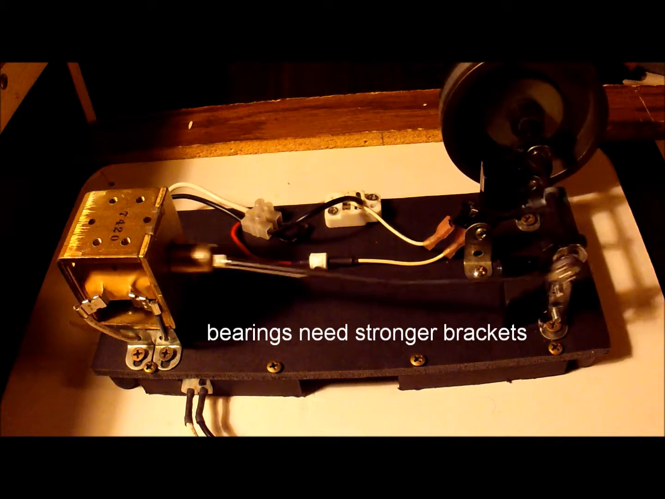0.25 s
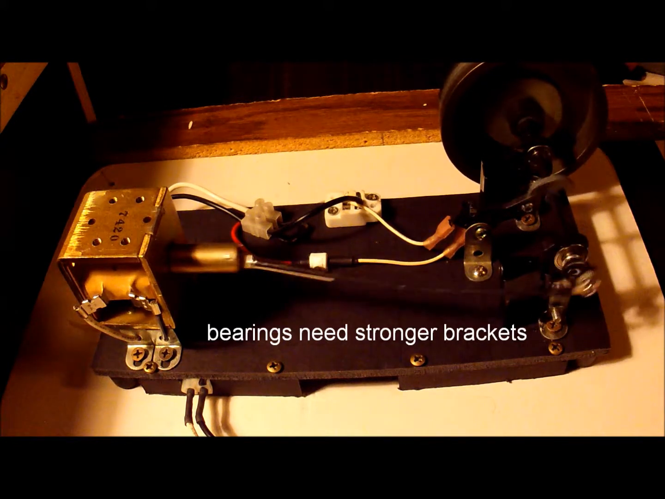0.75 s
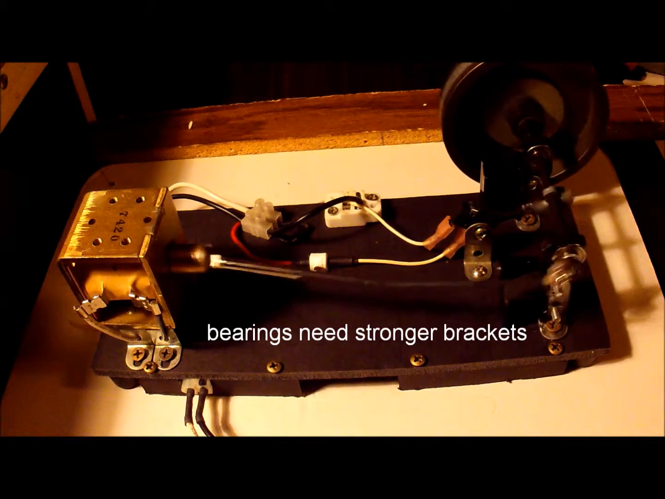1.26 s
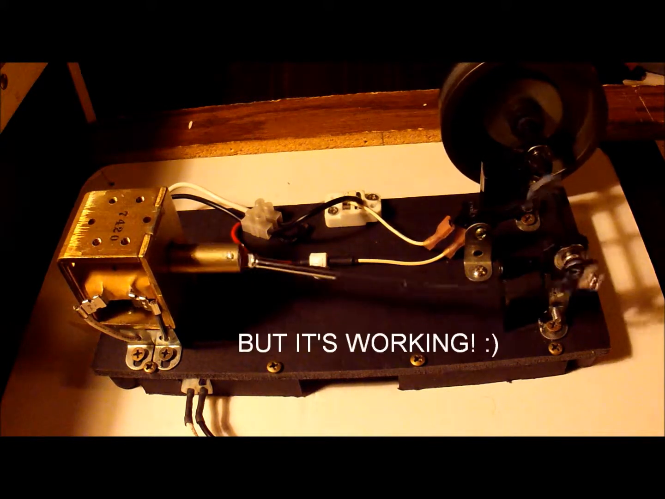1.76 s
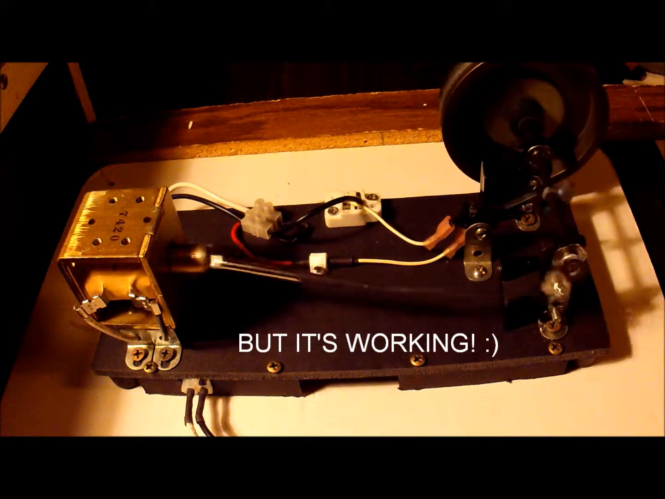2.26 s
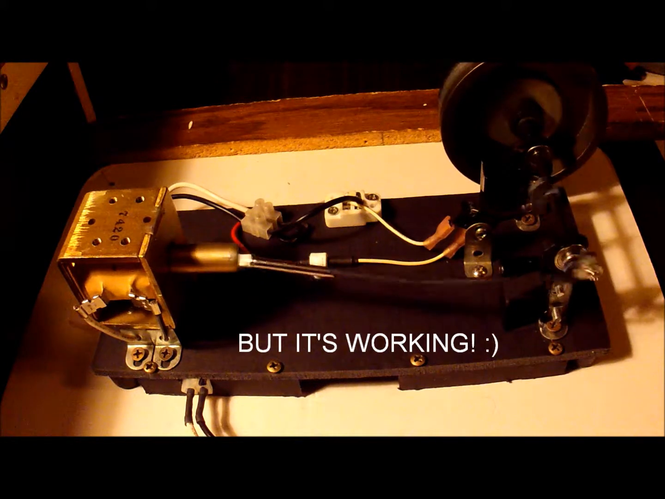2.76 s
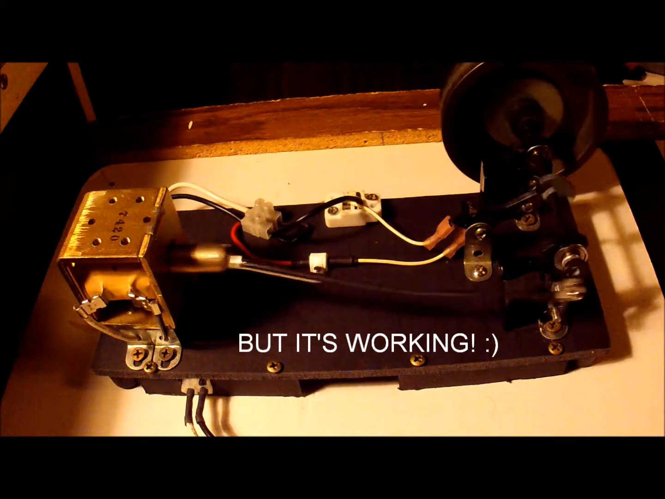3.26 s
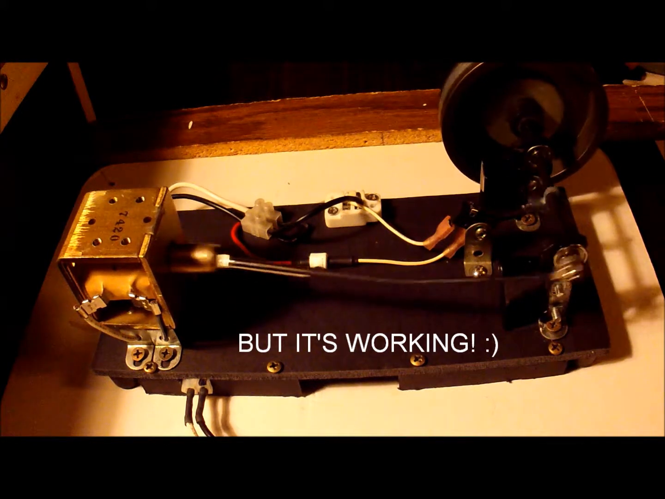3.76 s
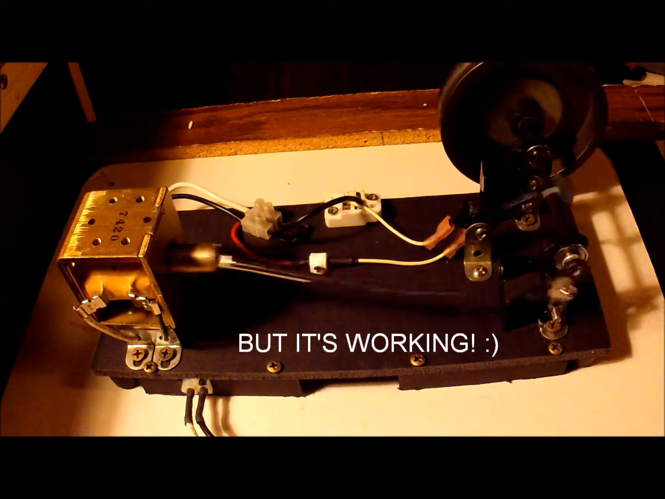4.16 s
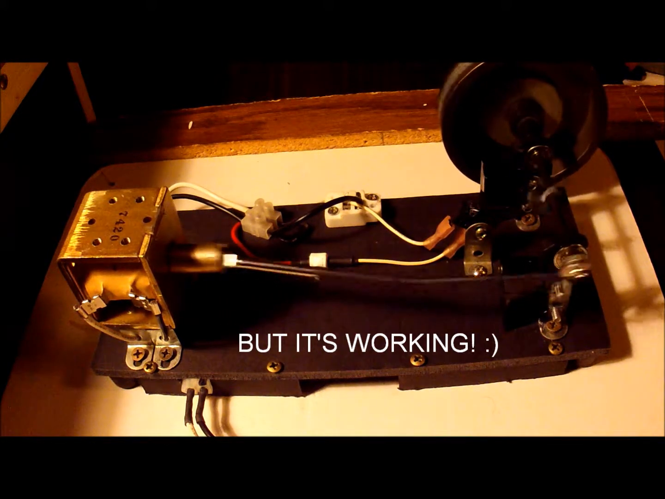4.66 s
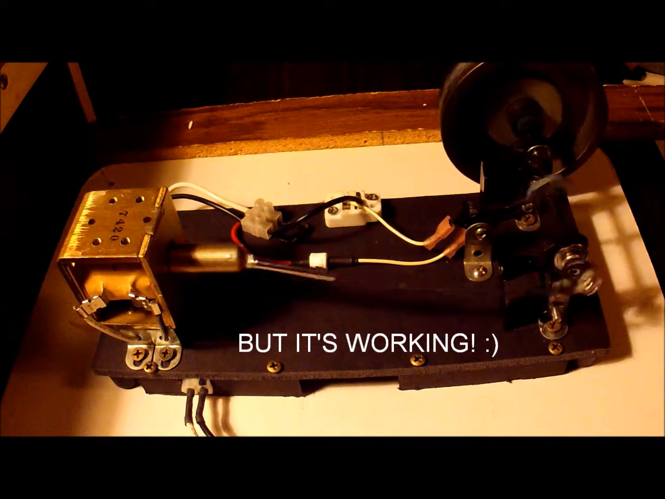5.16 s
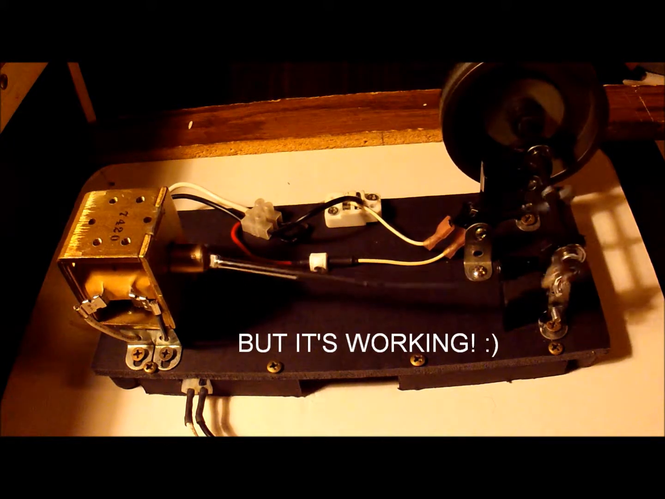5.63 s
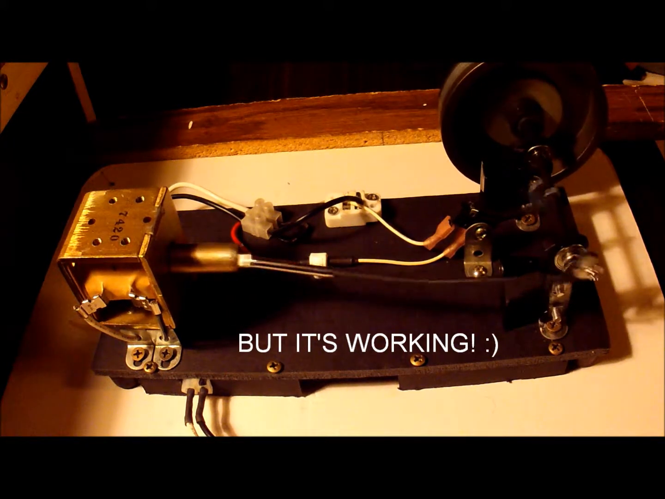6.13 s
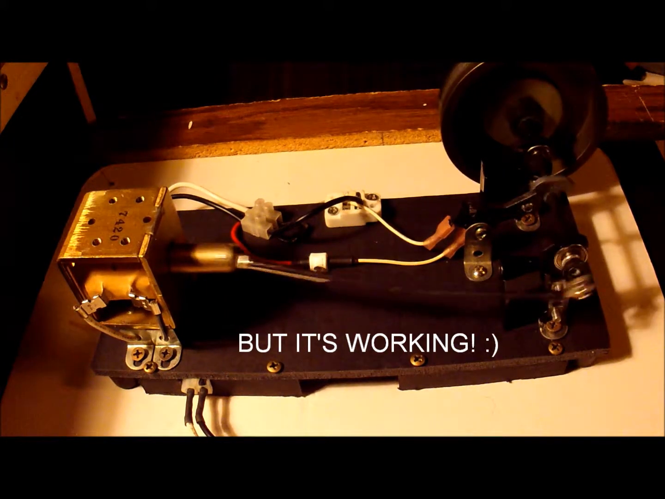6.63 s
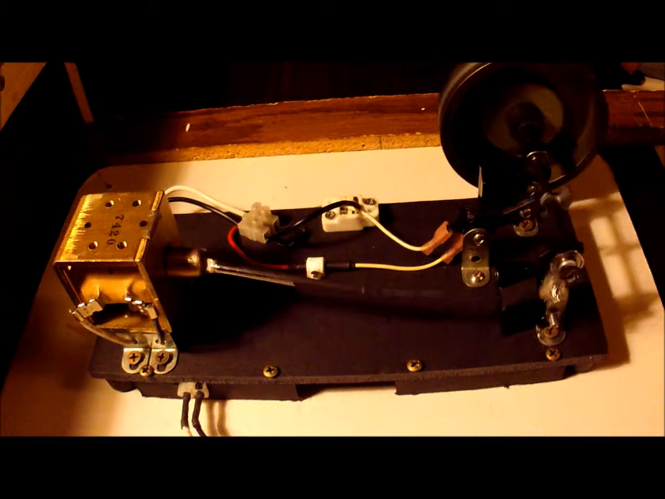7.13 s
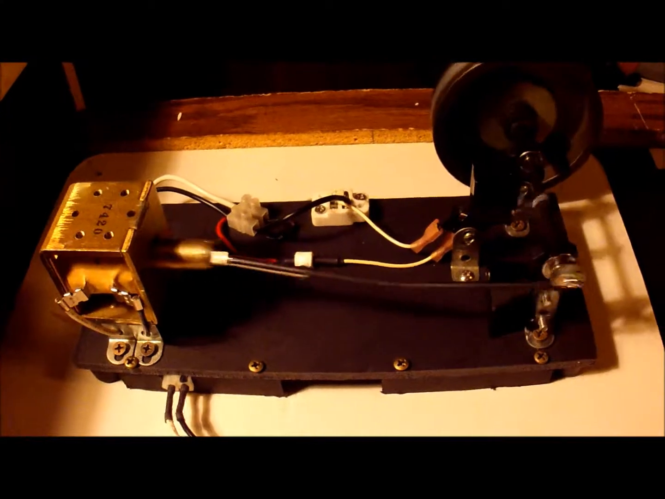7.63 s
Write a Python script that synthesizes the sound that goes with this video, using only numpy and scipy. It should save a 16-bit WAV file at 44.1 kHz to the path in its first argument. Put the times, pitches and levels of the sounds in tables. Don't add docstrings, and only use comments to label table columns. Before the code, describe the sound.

A small solenoid engine on a wooden board runs close to the microphone, clacking about three times a second and very slowly speeding up. Between clacks come a light rod tap, a contact tick, a scrape and a brief metallic singing. Steady hiss lies beneath, with a short small-room echo. In the last second fingers brush and knock the camera case, one knock especially sharp.

```python
import sys
import numpy as np
from scipy import signal
from scipy.fft import rfft, irfft
from scipy.io import wavfile
from scipy.ndimage import uniform_filter1d

SR = 44100
rng = np.random.default_rng(int(sys.argv[2]) if len(sys.argv) > 2 else 0)


def volts_from_db(level):
    exponent = np.asarray(level, float) / 20
    return 10 ** exponent


def unload_audio(sound):
    columns = np.transpose(np.atleast_2d(sound))
    steps = np.round(np.clip(columns, -1, 1) * 32767)
    wavfile.write(sys.argv[1], SR, steps.astype(np.int16))


N = 347949
TIME = np.arange(N) / SR

# t/s, level/dB, first bounce delay/ms, bounce level/dB
CLACKS = [(0.318, -28.5, 5.5, -4), (0.6483, -29, 5.1, -13), (0.9761, -27.5, 4.9, -7), (1.3008, -27, 7, -12),
          (1.6231, -28, 5.5, -25), (1.943, -26, 3.3, -16), (2.2617, -29.5, 4.7, -3),
          (2.5776, -28.5, 4.9, -6.5), (2.8921, -27, 5.2, -9), (3.2041, -29.5, 5, -12),
          (3.5146, -28, 6.55, -12.5), (3.8237, -27.5, 3.3, -17), (4.1318, -28, 7, -15),
          (4.4392, -27, 5.4, -13), (4.7456, -28, 6.6, -12), (5.0498, -30.5, 9.8, -1.5),
          (5.3541, -32, 3.35, 0.5), (5.6527, -31.5, 6.8, 0), (5.9532, -29, 6.9, -2.5),
          (6.252, -31, 5.1, -2), (6.5485, -30.5, 5.7, -0.5), (6.844, -31, 5.1, 0.5), (7.1382, -27, 6.1, -6),
          (7.4294, -31, 4.3, 4), (7.7216, -28.5, 3.5, -6)]
# t/s, level/dB
TAPS = [(0.143, -47), (0.484, -43.5), (0.795, -41.5), (1.129, -43.5), (1.464, -39), (1.778, -40),
        (2.098, -41), (2.404, -43), (2.713, -42), (3.038, -39.5), (3.337, -43.5), (3.648, -41.5),
        (3.956, -40), (4.267, -43), (4.57, -39.5), (4.874, -40.5), (5.177, -40), (5.477, -39.5),
        (5.779, -37.5), (6.077, -37.5), (6.375, -38.5), (6.67, -37), (6.965, -44), (7.258, -38),
        (7.551, -39), (7.84, -37)]
# t/s, level/dB, singing level/dB
CRESTS = [(0.252, -60, -41.5), (0.582, -48, -40), (0.909, -57, -43), (1.234, -53, -43),
          (1.559, -36.5, -41.5), (1.876, -43, -45), (2.195, -48, -43), (2.511, -56, -42.5),
          (2.824, -54, -42.5), (3.14, -38, -42), (3.448, -46, -43.5), (3.759, -33.5, -40),
          (4.067, -45, -41), (4.374, -32.5, -41), (4.68, -53, -40), (4.982, -53, -40), (5.285, -58, -40.5),
          (5.585, -44, -39.5), (5.885, -56, -41.5), (6.183, -40, -43.5), (6.482, -48, -41),
          (6.781, -45, -41), (7.068, -50, -43.5), (7.361, -56, -43), (7.653, -41, -42)]

MEAN_TURN_S = 0.31
# lead before the spark/s, extra lead/s per s of slower turn,
# level/dB, level gain/dB per turn/s, scatter/dB
CONTACT = (0.130, 0.6, -73, 21, 2)
PULL = (0.095, 0.55, -37, 14, 2.5)
RIDGE = (0.033, 0.1, -44, 10.5, 3.7)
GRIT_HZ, RADIATE_HZ = 2400, 800


def ring(x, hz, t60):
    radius = 1000. ** (-1 / (t60 * SR))
    w = 2 * np.pi * hz / SR
    return signal.lfilter([0, np.sin(w)], [1, -2 * radius * np.cos(w), radius * radius], x)


def band(x, lo_hz, hi_hz):
    y = signal.sosfilt(signal.butter(2, [lo_hz, hi_hz], "band", fs=SR, output="sos"), x)
    return y / y.std()


def highpass(x, order, hz):
    return signal.sosfilt(signal.butter(order, hz, "high", fs=SR, output="sos"), x)


def clicks(s, size):
    return np.bincount(np.clip((s * SR).astype(int), 0, N - 1), size, N)


def tent(x, at, db, rise, fall):
    return volts_from_db(db - np.where(x < at, abs(rise) * (at - x), abs(fall) * (x - at)))


def hold(a, on, off, db, rise, release, idle_db):
    this_turn = tent(a, on, db, rise, 0) * tent(a, off, 0, 0, release)
    last_turn = tent(a + 1, off, db, 0, release)
    return this_turn + last_turn + volts_from_db(idle_db)


def mic_db(hz):
    # f/Hz, level/dB
    colour = [(30, -24.5), (200, -14.5), (500, -13.5), (760, -9), (1050, -3), (1350, 0.5), (1700, -3),
              (2200, -11.5), (2700, -24), (4000, -26.5), (5000, -31), (7000, -28), (10500, -21.5),
              (15500, -16.5)]
    colour_hz, colour_db = np.transpose(colour)
    return np.interp(np.log(hz + 1e-9), np.log(colour_hz), colour_db)


def opening():
    s = np.r_[-0.012, np.array(CLACKS)[:, 0]]
    turn_s = uniform_filter1d(np.gradient(s), size=3, mode="nearest")
    return s + 0.011 + 0.26 * (turn_s - MEAN_TURN_S), turn_s


def part(lead_s, stretch, db, gain_db, scatter_db):
    s, turn_s = opening()
    at = s - lead_s - stretch * (turn_s - MEAN_TURN_S)
    db = db + gain_db * (1 / turn_s - 1 / MEAN_TURN_S) + scatter_db * rng.standard_normal(len(s))
    return at[at > 0], db[at > 0]


def turn():
    clack, crest = np.array(CLACKS)[:, 0] - 0.002, np.array(CRESTS)[:, 0]
    tap = np.array(TAPS)[:, 0]
    marks = [(clack, 1), (crest, 0.81), (part(*PULL)[0], 0.74), (part(*CONTACT)[0], 0.615), (tap[:-1], 0.45)]
    count = len(clack)
    s = np.concatenate([m for m, _ in marks] + [[-0.0056, tap[-1], 8.01]])
    angle = np.concatenate([np.arange(count) + a for _, a in marks] + [[0, count + 0.45, count + 1]])
    return np.interp(TIME, np.sort(s), np.sort(angle))


def still_air():
    return volts_from_db(-45.5) * rng.standard_normal(N)


def bench_drone():
    return volts_from_db(-65) * band(rng.standard_normal(N), 208.6, 298)


def room(near):
    echo = rng.standard_normal(SR // 4) * 1000. ** (-np.arange(SR // 4) / SR / 0.15)
    return signal.fftconvolve(near, echo)[:N] * volts_from_db(-41.5)


def grains(per_s, spread_db):
    chance = rng.random((3, N))
    sign = np.sign(chance[1] - 0.5)
    x = (chance[0] < per_s / SR) * sign * volts_from_db(-spread_db * np.log(chance[2] + 1e-4))
    return x / x.std()


def brushing():
    # strongest t/s, rasp level/dB, rise/dB per s, fall/dB per s, hiss over rasp/dB
    strokes = [(6.935, -65, 250, 60, 0.5), (7.02, -67, 60, 180, -1.5), (7.35, -60.5, 450, 320, -6),
               (7.62, -77, 45, 40, -8)]
    press = sum(tent(TIME, *row[:4]) for row in strokes)
    slide = sum(tent(TIME, *row[:4]) * volts_from_db(row[4]) for row in strokes)
    skin = grains(9000, 1.6)
    rasp = (band(skin, 2230, 4700) + 0.22 * band(skin, 1100, 2400)) * press * volts_from_db(30.5)
    return rasp + band(skin, 9500, 15000) * slide * volts_from_db(21)


def knocking():
    # t/s, level/dB, thud level/dB, edge level/dB, snap level/dB
    knocks = [(6.887, -31.5, -44, -17, -26), (7.18, -43, -29, -19, -22), (7.453, -40, -25, -16, -25),
              (7.545, -20, -55, -16.5, -23), (7.567, -33.5, -22, -22, -31), (7.679, -17, -58, -10.5, -38),
              (7.78, -27, -24, -14, -34.5), (7.802, -32, -26, -20, -38)]
    # t/s, level/dB, t60/s
    booms = [(7.445, -63.5, 0.2), (7.568, -63.5, 0.39), (7.776, -58, 0.094)]
    s, db, thud_db, edge_db, snap_db = np.transpose(knocks)
    hit = clicks(s + 0.00041, volts_from_db(db))
    case = 0.33 * ring(hit, 1450, 0.026) - 0.3 * ring(hit, 1020, 0.035) - 0.13 * ring(hit, 1750, 0.027)
    case = highpass(case, 3, 650)
    thud = ring(clicks(s, volts_from_db(db + thud_db + 16.5)), 430, 0.012)
    for boom_s, boom_db, t60 in booms:
        thud += ring(clicks(np.array([boom_s]), volts_from_db(np.array([boom_db + 17]))), 253.6, t60)
    edge = clicks(s + 0.00088, volts_from_db(db + edge_db + 17))
    edge = ring(edge, 2710, 0.014) - 0.61 * ring(edge, 2020, 0.0054)
    mid = clicks(s + 0.00097, volts_from_db(db + edge_db + 14.5) + volts_from_db(db + snap_db + 27.5))
    mid = ring(mid, 3600, 0.0088) - ring(mid, 4400, 0.0017)
    snap = clicks(s + 0.0003, volts_from_db(db + snap_db + 24))
    snap = ring(snap, 11200, 0.0051) - ring(snap, 13300, 0.004) + ring(snap, 15200, 0.004)
    return case + thud + edge + mid + snap


def sparks():
    # f/Hz, t60/s, level/dB
    spring = [(10400, 0.011, -0.5), (15200, .008, -2), (7000, .006, -17), (8830, 0.0056, 2)]
    s, db = part(0, 0, -54.5, 8, 1.2)
    snap = clicks(s + 0.0004, volts_from_db(db - 0.5))
    return sum(ring(snap, hz, t60) * volts_from_db(mode_db - mic_db(hz)) for hz, t60, mode_db in spring)


def worn(angle, count, spread_db):
    place = rng.random((count, 3))
    fresh = rng.standard_normal((len(CLACKS) + 1, count, 2))
    turns = np.arange(len(fresh))[:, None]
    where = turns + place[:, 0] + 0.0006 * np.cumsum(fresh[..., 0], axis=0)
    size_db = -spread_db * np.log(place[:, 2] + 0.049) + 2.6 * fresh[..., 1]
    size = np.sign(place[:, 1] - 0.5) * volts_from_db(size_db)
    x = clicks(np.interp(where, angle, TIME, left=0, right=0).ravel(), size.ravel())
    x[0] = 0
    return x / x.std()


def rubbing(a):
    jolts = (.002, .455, .62, .742, .808, .94)
    # scrape level/dB, grit level/dB, rise/dB per turn, fall/dB per turn
    rubs = [
        (-33.5, -73, 900, 435),
        (-49.5, -89, 1100, 230),
        (-47.5, -70, 1600, 150),
        (-46, -79, 903, 252),
        (-36.5, -82, 300, 342),
        (-55, -80.5, 250, 250),
    ]
    scrape_gain, grit_gain = 0, 0
    for at, (scrape_db, grit_db, rise, fall) in zip(jolts, rubs):
        for lap in (0, 1):
            scrape_gain = scrape_gain + tent(a - lap, at, scrape_db, rise, fall)
            grit_gain = grit_gain + tent(a - lap, at, grit_db, rise, fall * 1.55)
    grit_gain = grit_gain + hold(a, jolts[2], 1, db=-83.5, rise=1500, release=87, idle_db=-89)
    return scrape_gain, grit_gain


def singing(angle):
    # f/Hz, t60/s, level/dB
    tones = [(1092.3, 0.2, 0.5), (963, 0.084, -10.5), (1120, 0.022, -39)]
    a = angle % 1
    gain = hold(a, 0.79, 0.945, db=-5, rise=128, release=292, idle_db=-33)
    gain = gain + tent(a, 0, -9.5, 0, 500)
    crest_s, _, sing_db = np.transpose(CRESTS)
    effort_db = np.interp(TIME, crest_s + 0.026, sing_db)
    rough = worn(angle, count=300, spread_db=-2) + 0.62 * rng.standard_normal(N)
    chatter = gain * volts_from_db(effort_db - 17.5) * rough
    return sum(ring(chatter, hz, min(t60, 0.09)) * volts_from_db(db - 3 - mic_db(hz)) for hz, t60, db in tones)


def dust(angle):
    rough = worn(angle, count=500, spread_db=6) + 0.4 * rng.standard_normal(N)
    return band(rough, 3300, 7640) + volts_from_db(-10) * band(rng.standard_normal(N), 8700, 16000)


def thud():
    s, db, _, _ = np.transpose(CLACKS)
    return ring(clicks(s - 0.003, volts_from_db(db - 20)), 470, 0.018)


def bearing_tick():
    s, db = part(-0.05, 0, -60, -20, 2)
    tick = clicks(s, volts_from_db(db + 17))
    return ring(tick, 2085, 0.025) - 0.32 * ring(tick, 1250, 0.028)


def blows():
    CLACK, TAP, CLOSE, SCRAPE = range(4)
    s, db, ms, bounce_db = np.transpose(CLACKS)
    late = rng.standard_normal((len(s), 2)).T
    (tap_s, tap_db), (crest_s, crest_db, _) = np.transpose(TAPS), np.transpose(CRESTS)
    (contact_s, contact_db), (pull_s, pull_db), (ridge_s, ridge_db) = part(*CONTACT), part(*PULL), part(*RIDGE)
    rebound_s = s + (ms + 3.184 + 1.242 * late[0]) / 1e3
    rows = [
        (s - 0.0024, db - 27, CLACK),
        (s - 0.0006, db - 19, CLACK),
        (s + 0.000098, db - 19.5, CLACK),
        (s - 0.0006 + ms / 1e3, db + bounce_db - 16.5, CLACK),
        (rebound_s, db - 25 + 1.9 * late[1], CLACK),
        (s + 0.01, db - 31.5, CLACK),
        (tap_s + 0.00058, tap_db - 11, TAP),
        (tap_s + 0.0066, tap_db - 16, SCRAPE),
        (tap_s + 0.018, tap_db - 23, TAP),
        (pull_s, pull_db - 9, SCRAPE),
        (crest_s, crest_db - 8, SCRAPE),
        (crest_s - 0.009, crest_db - 12, SCRAPE),
        (crest_s + 0.0038, crest_db - 14, SCRAPE),
        (contact_s, contact_db - 4, CLOSE),
        (s - 0.38 * np.gradient(s), np.full(len(s), -73), CLOSE),
        (ridge_s, ridge_db - 9, TAP)]
    return np.concatenate([np.array([t, volts_from_db(d), np.full(len(t), kind)]) for t, d, kind in rows], axis=1)


def body(angle, scrape_gain, grit_gain):
    # f/Hz, t60/s, clack level/dB, tap level/dB, contact
    # level/dB, scrape level/dB
    body_modes = [(259, 0.058, -40, -22, -45, -28), (317, 0.034, -21.5, -12.5, -41, -29),
                  (519.6, 0.081, -14, -25.5, -31, -41), (680, 0.016, -9, -25, -22, -29.5),
                  (916, 0.13, 6.5, -8, 22.5, -3), (1116, 0.11, -4, 8.5, 27, -9),
                  (1247, 0.034, 5.5, -24, 24.5, -16), (1371, 0.041, 6.5, 4, 26, 2.5),
                  (1520, 0.025, 7.5, 3.5, 21, 7), (1682, 0.032, -22, 3.5, 24.5, 2),
                  (1815, 0.038, 5.5, -22, -14, -6.5), (2084, 0.016, 13, -16, 21, -2),
                  (2180, 0.023, -29, -8.5, -18, -24),
                  (2524, 0.027, -71, -11, 9.5, -6.5), (2800, 0.009, -10, -22, 8.5, -10),
                (3212, 0.0095, -92, -47, 13, -27), (3730, 0.014, -58, -62, 5.5, -49),
                (3730, 0.018, -57, -19, -28, -32), (3944, 0.012, -76, -19.5, 3.5, -54),
                (4190, 0.036, -20.5, -41, -4, -47), (4334, 0.019, -9, -43, 1.5, -36.5),
                (4765, 0.011, -13, -34, 1, -38), (5050, 0.028, -15.5, -46, -6, -46),
                (7730, 0.0098, -56, -56, 2, -54), (8650, .01, -50, -65, -5.5, -63)]
    modes = body_modes
    s, size, kind = blows()
    kind = kind.astype(int)
    scatter_db = 2.6 * rng.standard_normal((len(s), len(modes)))
    scrape = worn(angle, count=260, spread_db=-1.5) + 0.5 * rng.standard_normal(N)
    scrape = scrape_gain * volts_from_db(-29.5) * scrape
    grit = worn(angle, count=300, spread_db=2.5) + 0.33 * rng.standard_normal(N)
    grit = grit_gain * volts_from_db(-16) * grit
    board, metal = np.zeros((2, N))
    for k, (hz, t60, *db) in enumerate(modes):
        gain = (-1) ** k * volts_from_db(np.array(db) - mic_db(hz))
        if RADIATE_HZ < hz < GRIT_HZ:
            gain[:2] = abs(gain[:2])
        drive = clicks(s, size * gain[kind] * volts_from_db(scatter_db[:, k])) + gain[3] * scrape
        if hz > GRIT_HZ:
            drive = drive + gain[2] * grit
        if hz > RADIATE_HZ:
            metal += ring(drive, hz, min(t60, 0.05))
        else:
            board += ring(drive, hz, t60)
    return board, metal


def engine():
    angle = turn()
    scrape_gain, grit_gain = rubbing(angle % 1)
    board, metal = body(angle, scrape_gain, grit_gain)
    metal = highpass(metal + singing(angle), 4, 760)
    return board + bearing_tick() + thud() + metal + grit_gain * volts_from_db(30) * dust(angle)


def scene():
    near = engine() + sparks()
    return (near + room(near) + bench_drone() + knocking() + brushing() + still_air())[None]


def low_pass(x):
    return signal.sosfilt(signal.butter(12, 16460, fs=SR, output="sos"), x)


def record(dry):
    # f/Hz, width/Hz
    notches = [(3000, 845), (6000, 2020), (8000, 4100)]
    # f/Hz, rms level/dB
    buzz = [(30, -84), (60, -82), (90, -85), (120, -90.5), (150, -93.5), (180, -105), (15231, -92)]
    log_gain = np.log(volts_from_db(mic_db(np.fft.rfftfreq(4096, 1 / SR))))
    cepstrum = irfft(log_gain)
    cepstrum[1:2048] *= 2
    cepstrum[2049:] = 0
    response = irfft(np.exp(rfft(cepstrum)))[None, :2048]
    x = signal.fftconvolve(dry, response)[:, :N]
    for hz, width_hz in notches:
        x = signal.lfilter(*signal.iirnotch(hz, hz / width_hz, SR), x)
    x = x + sum(volts_from_db(db) * np.sqrt(2) * np.cos(2 * np.pi * hz * TIME) for hz, db in buzz)
    x = signal.sosfilt(signal.ellip(14, 0.3, 36, 15740, fs=SR, output="sos"), x)
    return low_pass(x)


dry = scene()
out = record(dry)
unload_audio(out)
```